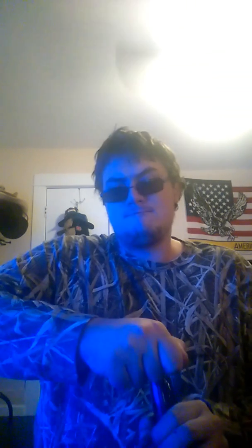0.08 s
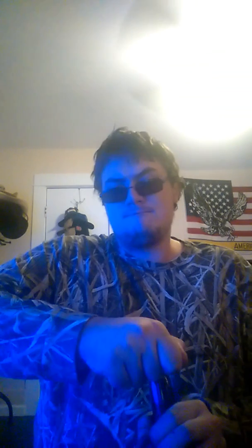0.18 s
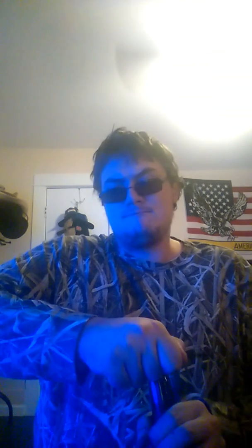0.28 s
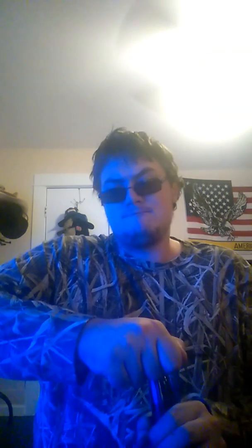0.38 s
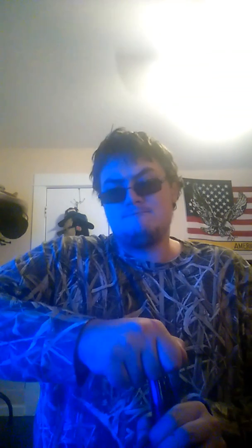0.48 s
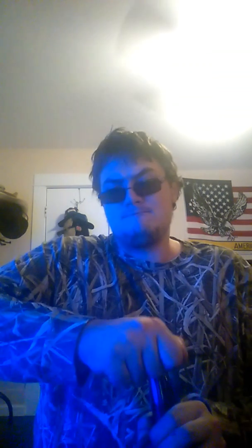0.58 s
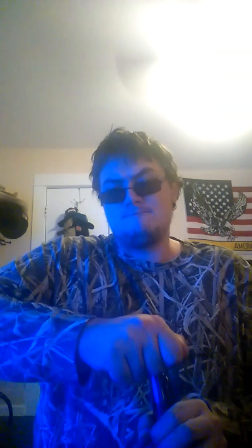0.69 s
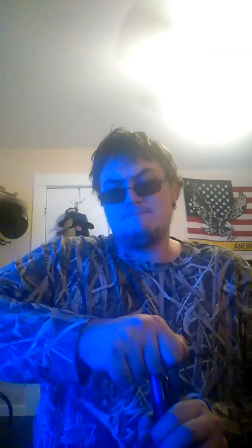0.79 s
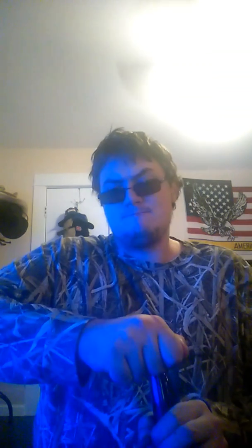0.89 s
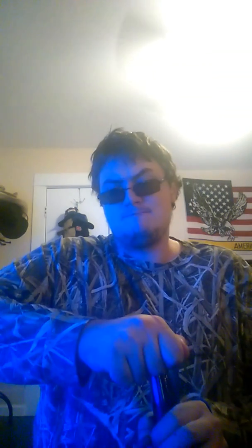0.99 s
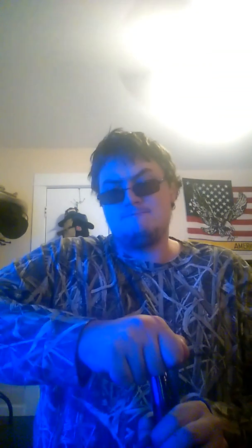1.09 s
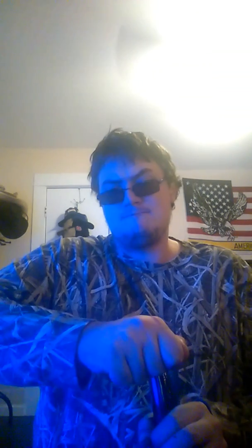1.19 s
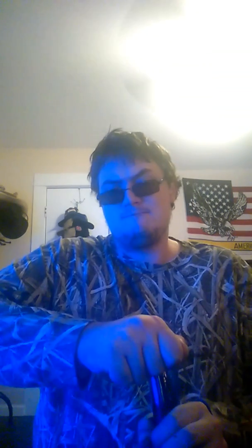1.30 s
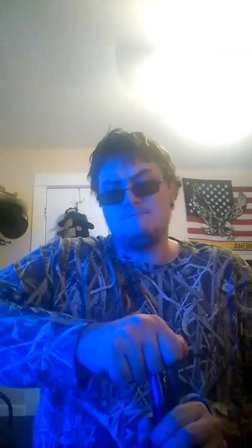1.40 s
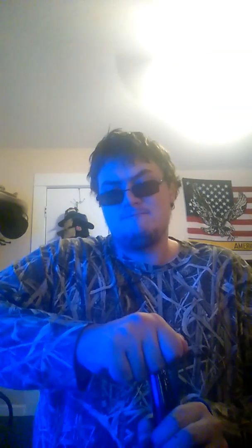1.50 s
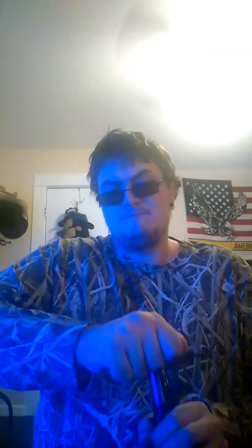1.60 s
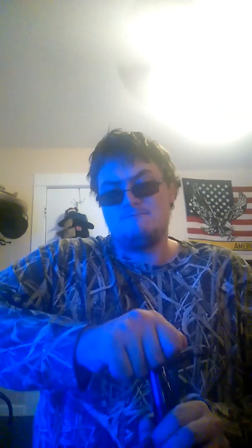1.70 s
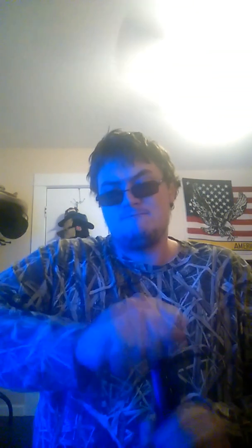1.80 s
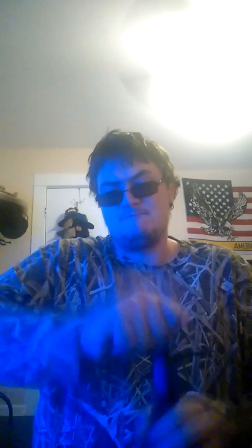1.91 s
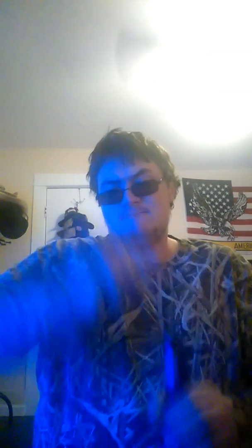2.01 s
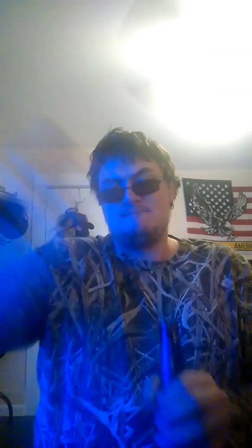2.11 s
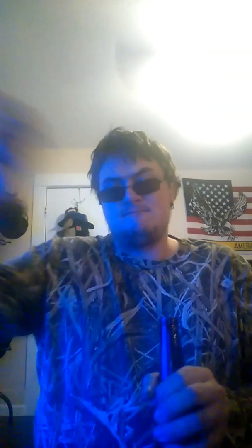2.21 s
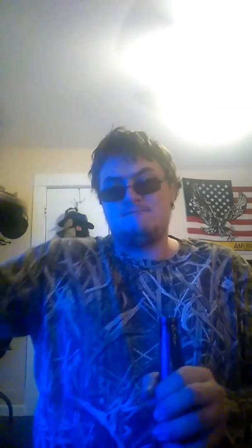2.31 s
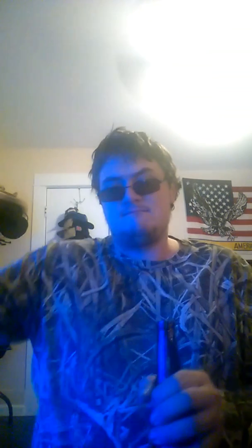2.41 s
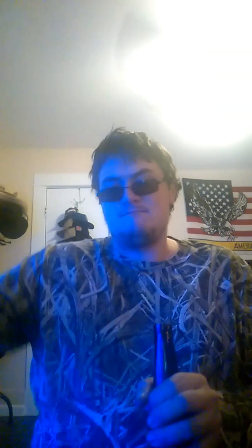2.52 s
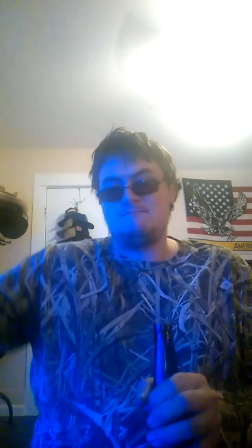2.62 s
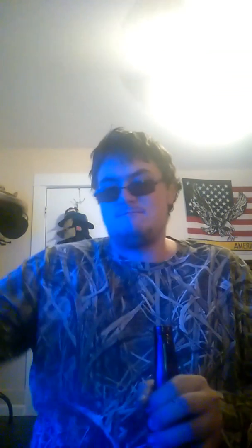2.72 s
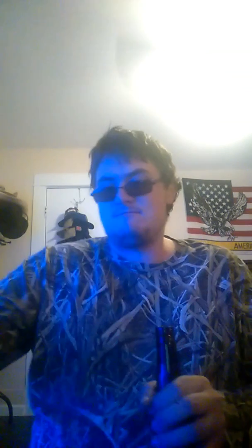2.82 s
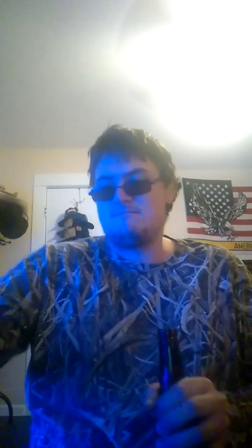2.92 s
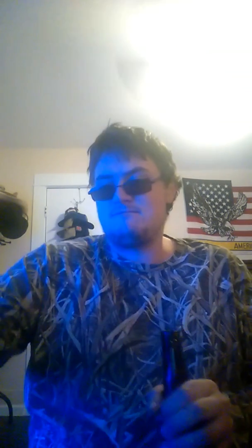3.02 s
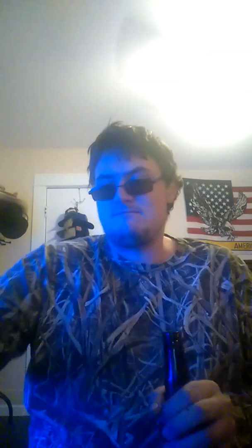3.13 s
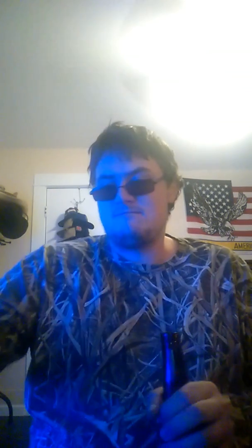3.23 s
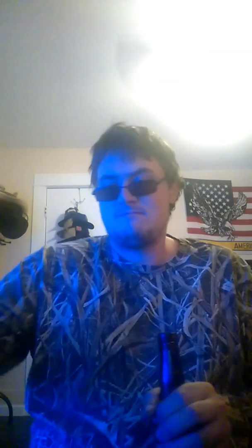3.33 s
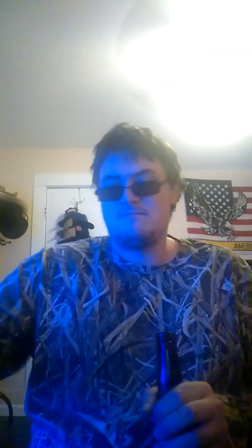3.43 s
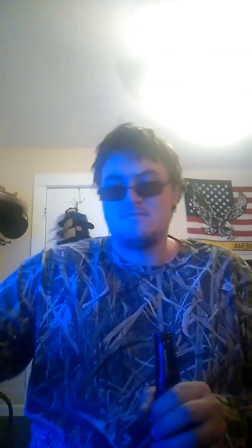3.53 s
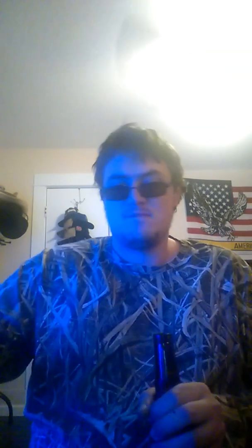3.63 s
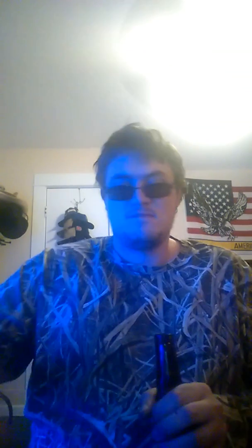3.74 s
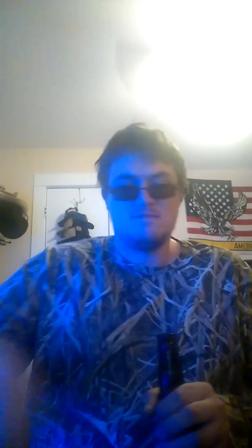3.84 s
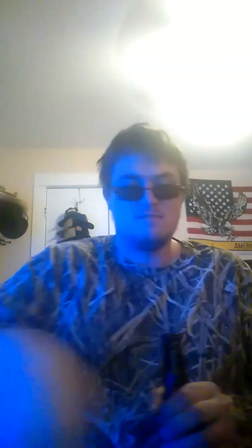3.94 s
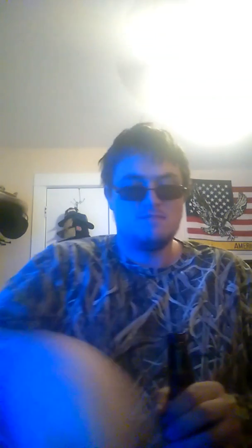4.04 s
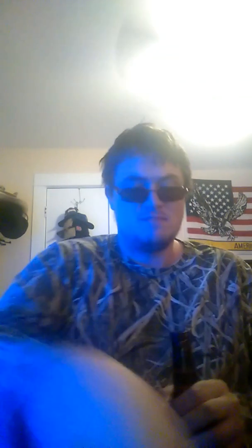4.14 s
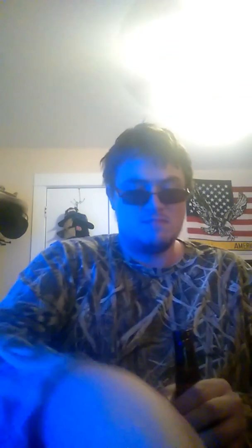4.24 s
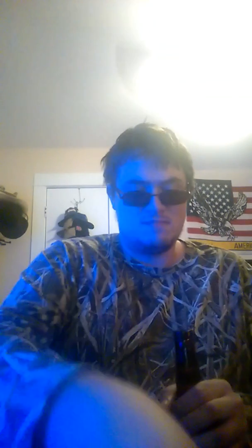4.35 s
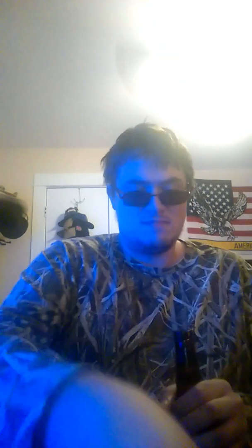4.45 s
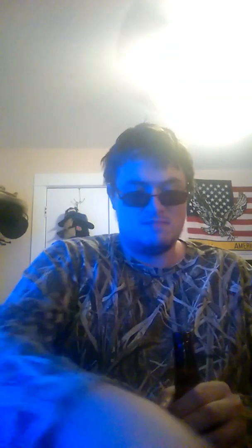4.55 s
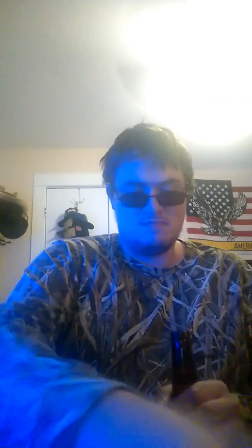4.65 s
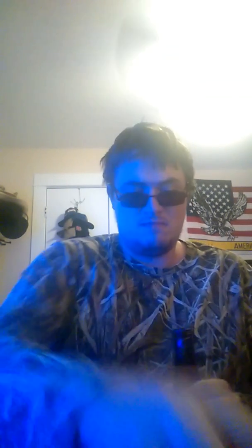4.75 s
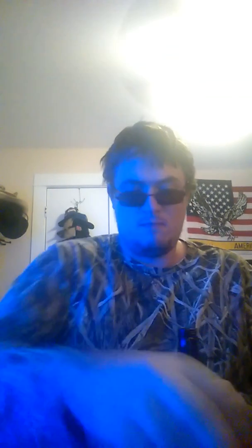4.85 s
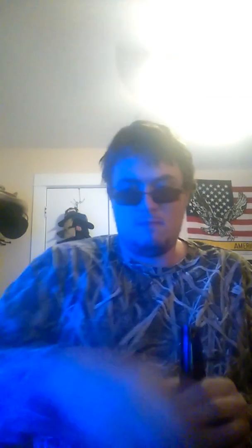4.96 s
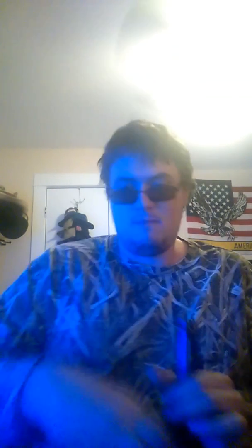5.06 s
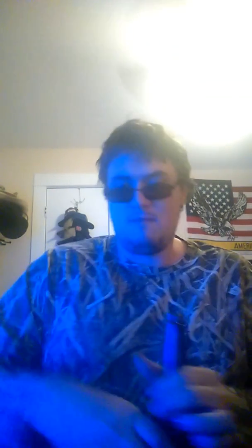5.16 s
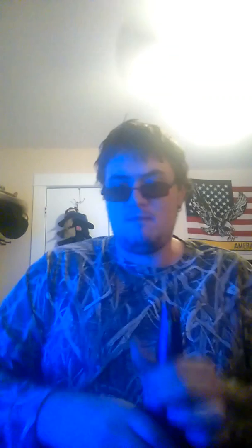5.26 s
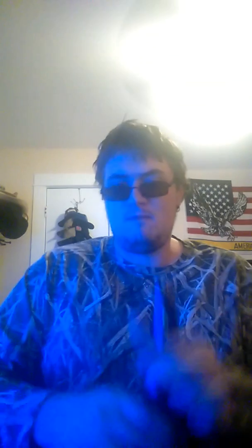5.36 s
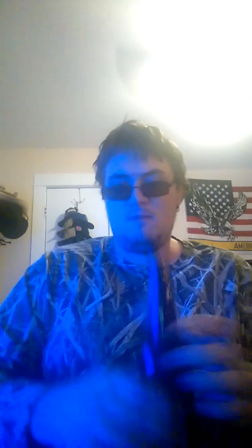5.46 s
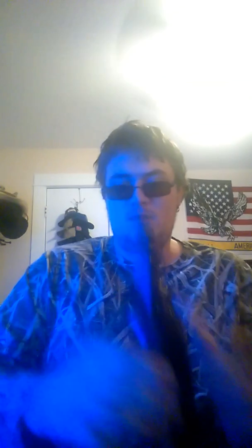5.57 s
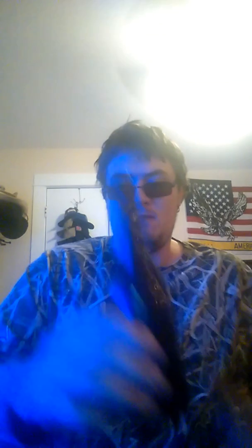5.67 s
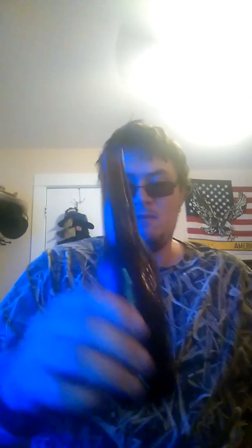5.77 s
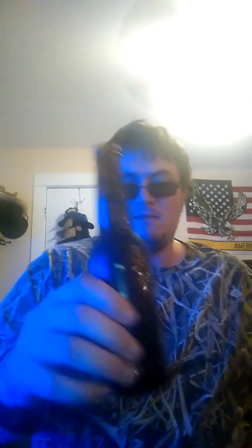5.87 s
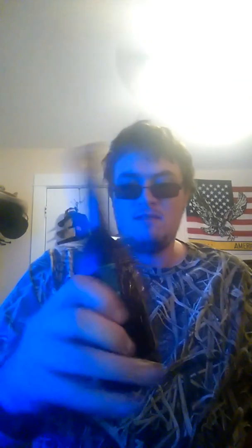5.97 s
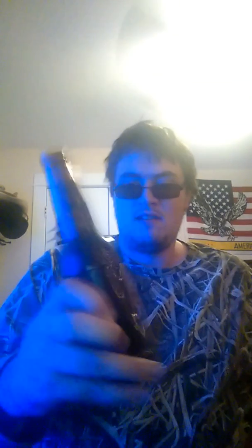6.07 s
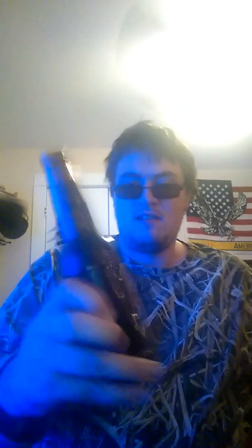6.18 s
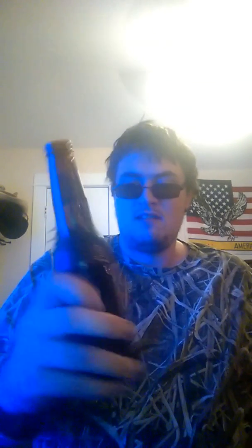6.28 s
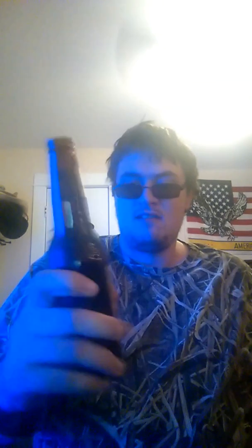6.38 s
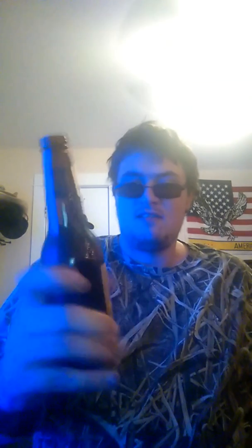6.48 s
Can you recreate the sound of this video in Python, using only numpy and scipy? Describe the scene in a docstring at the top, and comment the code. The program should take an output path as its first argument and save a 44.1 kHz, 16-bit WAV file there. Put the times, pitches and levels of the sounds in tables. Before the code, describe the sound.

A close stereo microphone in a small room catches low background rumble and faint fizz. After dull finger touches, a bottle cap snaps loose with sharp clicks and a fading hiss. The light cap clinks and skips across a table. A heavier steel opener is laid and dropped on the desk, the loudest event, leaving a high glassy ring, then a very soft hum from the swung open bottle.

```python
"""A hand handles a glass bottle in a quiet room, close to a pair of microphone ports.
Fingers tap the glass and gas hisses; the cap is pried off, with blows that ring its modes and
short tones of the air beneath it. The tossed cap bounces on a table; the steel opener is laid and
dropped on the desk, where it clatters, rings out and jolts a standing glass into a long ring.
At last the open bottle hums as it is swung, a gliding sine; shaped noise rumbles throughout."""
import sys
import numpy as np
from scipy import signal
from scipy.fft import rfft, irfft, next_fast_len
from scipy.io import wavfile
from scipy.ndimage import uniform_filter1d

SR = 44100
rng = np.random.default_rng(int(sys.argv[2]) if len(sys.argv) > 2 else 0)


def persist_wave(psi):
    """Save psi, clipped to +-1, as 16-bit WAV."""
    counts = np.round(np.clip(psi, -1, 1) * 32767).astype(np.int16)
    wavfile.write(sys.argv[1], SR, np.atleast_2d(counts).T)


N = 285953

# spectrum of the opener's cracks and scrapes on the desk: hz, density_db (per Hz, relative)
KNOCK_COLOUR = [(35, -45.5), (60, -22), (236, -15.5), (319, -24.5), (787, -14.5), (905, -7.5), (993, -8),
                (1110, -4), (1900, -6), (3170, -3), (5520, -10), (7130, -10), (12700, -19.5),
                (15300, -35.5)]
# modes of the steel opener: hz, level_db (relative), t60_s (when fully free)
OPENER_MODES = [(6627, -14, .26), (7063, -4, .2), (7316, -8, .22), (7871, -5, .24), (8318, -6, .28),
                (9143, -3, .2), (9224, -6, .3), (9975, -9, .2), (10225, -3, .23), (10935, -8, .28),
                (11740, -12, .18), (12575, -11, .2), (12970, -16, .22), (14050, -19, .22)]
# the hand damps the opener until it lets go: freedom to ring 0-1
HELD_FREEDOM, LOOSE_FREEDOM, LET_GO_S = .22, 0.66, 4.7


def amp(db):
    """Logarithmic level: the amplitude gain of a value in dB."""
    return 10 ** (np.asarray(db) / 20)


def evened(x):
    """Power normalisation: scales to rms 1."""
    return x / np.sqrt(np.mean(x ** 2) + 1e-20)


def read(points, hz):
    """Interpolates a spectrum table on a log-frequency axis, as hearing spaces pitch."""
    table_hz, value = np.transpose(points)
    return np.interp(np.log(hz + 1), np.log(table_hz + 1), value)


def curve(rows, column=1):
    """Piecewise-linear envelope: a column of a time table at every sample."""
    columns = np.transpose(rows)
    return np.interp(np.arange(N) / SR, columns[0], columns[column])


def add(mix, start_s, sound):
    """Superposition: mixes a sound in at its start time."""
    part = mix[:, round(start_s * SR):][:, :sound.shape[1]]
    part += sound[:, :part.shape[1]]


def coloured(x, table, tilt_db=0):
    """Spectral shaping with mean power gain 1; tilt_db per octave lowers what lies above 2 kHz."""
    size = next_fast_len(x.shape[-1])
    hz = np.fft.rfftfreq(size, 1 / SR)
    octaves = np.log2(np.maximum(hz, 200) / 2000)
    gain = evened(amp(read(table, hz) - tilt_db * octaves))
    return irfft(rfft(x, size) * gain, size)[..., :x.shape[-1]]


def noise_pair(size, same):
    """Partial coherence: two noises sharing a part of their amplitude."""
    first, other = rng.standard_normal((2, size))
    same = np.clip(same, 0, 1)
    return np.array([first, same * first + np.sqrt(1 - same ** 2) * other])


def ring(modes, t, uneven_db, freedom=1, tilt_db=0):
    """Modal decay: the striking point sets each mode's share, and each port hears its own phase."""
    hz, db, t60 = np.transpose(modes)[:, :, None]
    db = db - tilt_db * np.log2(hz / 600)  # dull blows favour the low modes
    share, phase, apart = rng.standard_normal((3, len(modes), 1))
    decay_db = -60 * t / (t60 * np.clip(freedom, .1, 1.2))
    envelope = amp(db + uneven_db * share + decay_db) * np.minimum(t / 0.0033, 1)
    angle = 2 * np.pi * hz * t + 3 * phase
    return np.array([(envelope * np.sin(angle + side * apart)).sum(0) for side in (0, 1.2)])


def blows(rows, contact, freedom, colour, modes, surface, same, tick, snap, patchy_db):
    """Impact excitation: a tick, a dying crack of noise, the object's modes and the surface's."""
    out, t = np.zeros((2, N)), np.arange(16384) / SR
    hz = np.fft.rfftfreq(len(t), 1 / SR)
    lead = 1024  # samples of room for the filter's spread
    base_t60, base_rise, base_surface_db, soften = contact
    for start_s, db, ring_db, dull_db in rows:
        softness = amp(-soften * db)
        rise = max(base_rise * softness, 1e-4)
        t60 = base_t60 * softness
        surface_db = base_surface_db - soften * db
        crack = noise_pair(len(t), same) * amp(-60 * t / max(t60, .005)) * np.minimum(t / rise, 1)
        crack *= 1 + snap * amp(-60 * t / 0.0077)  # most of the force comes in the first milliseconds
        crack[:, int(rise * SR / 2)] += tick * 0.0012 / (rise + 0.00037)  # slow contacts barely tick
        # each contact has its own patchy colour
        spots_db = patchy_db * np.interp(hz, np.linspace(0, SR / 2, 60), rng.standard_normal(60))
        crack = coloured(np.roll(crack, lead, 1), colour, dull_db)
        crack = irfft(rfft(crack) * amp(spots_db))
        crack *= amp(-.25 * np.maximum(lead - np.arange(len(t)), 0))  # hushes what precedes the contact
        add(out, start_s - lead / SR, amp(db - 12.5) * crack[:, :12288])
        body = ring(modes, t[:12288], 3., freedom(start_s))
        add(out, start_s, amp(db - 12 + ring_db) * body)
        struck_surface = ring(surface, t[:9216], 2.5, tilt_db=2 * dull_db)
        add(out, start_s, amp(db - 12 + surface_db) * struck_surface)
    return out


def ports(x, pair):
    """Interaural-style cues: level and phase between the left and right ports, by frequency."""
    level_table, phase_table = pair
    size = next_fast_len(N)
    hz = np.fft.rfftfreq(size, 1 / SR)
    half = amp(read(level_table, hz) / 2) * np.exp(.5j * read(phase_table, hz))
    return irfft(rfft(x, size) * np.array([half, 1 / half]), size)[:, :N]


def cap_pried():
    """Stick-slip impacts: the cap slips off the lip, ringing its metal and the bottle neck."""
    # slips of the cap: start_s, blow_db (relative), ring_db (re blow), dullness_db (per octave)
    slips = [(1.948, -17, -14, -0.1), (1.963, -9, -16, -0.5), (1.9705, -6.5, -14, -2.5),
             (2.005, -2.5, -9, -3), (2.017, -17, -13.5, -0.7), (2.073, -24, -21.5, -0.2),
             (2.08, -9.5, 0.5, -0.3)]
    # contact at a 0 dB blow: crack t60_s, rise_s, surface_db, softening of weaker blows (ratio)
    contact = (0.0652, .0003, -21, 0.7072)
    # spectrum of each crack: hz, density_db (per Hz, relative)
    colour = [(180, -35.5), (300, -42.5), (754, -15), (997, -6), (1200, -17.5), (3050, -7), (3660, -4),
              (5000, -7.5), (5800, -17.5), (8330, -2), (12400, -10.5), (14100, -4.5), (15300, -40)]
    # modes of the cap on the neck: hz, level_db (relative), t60_s (when fully free)
    cap_modes = [(6300, -8, .06), (7900, -3, .04), (8450, -1, .06), (9800, -4, .03), (12000, -4, .03),
                 (13400, -4, .03)]
    # modes of the glass neck: hz, level_db (relative), t60_s
    neck_modes = [(3100, -3, .03), (4100, -2, .03), (4600, 0, .035), (5050, 0, .03)]
    # direction at the ports: (hz, left_minus_right_db), (hz, left_lead_rad)
    direction = [(60, 13), (180, -12.5), (540, 4.5), (1640, 6.5), (4940, -2.5), (14900, -3)], [(0, -2),
                 (3960, 2), (5770, 10), (12300, 10), (15100, 25)]
    struck = blows(slips, contact, lambda s: .55, colour, cap_modes, neck_modes,
                   same=0.78, tick=7.3, snap=2.5, patchy_db=3.0)
    return ports(struck, direction)


def cap_bouncing():
    """Repeated impacts of a light plate: the tossed cap rings its modes and the table's."""
    # bounces of the cap: start_s, blow_db (relative), ring_db (re blow), dullness_db (per octave)
    bounces = [(2.971, -23, -16, -1.9), (3.124, 5, -3.5, .6), (3.134, -4, -0.8, .1),
               (3.144, -10.5, -6.5, -.1), (3.153, 2.5, -9, 1.1), (3.223, -3.5, -10.5, .6),
               (3.242, -4, -7, -.3), (3.357, -8.5, -5.5, -.4), (3.47, -7.5, -4, -0.27),
               (3.576, -4, -5, -.7), (3.613, -14, -6.5, -.2), (3.66, -4, -6, -1.4), (3.681, -12.5, -7, -.6),
               (3.6905, -10, -4.5, -.3), (3.718, -8, -8.5, -.3)]
    # contact at a 0 dB blow: crack t60_s, rise_s, surface_db, softening of weaker blows (ratio)
    contact = (0.0571, .0006, -16, -0.2138)
    # spectrum of each crack: hz, density_db (per Hz, relative)
    colour = [(88, -53.5), (150, -28.5), (403, -14.5), (508, -21), (628, -13), (719, -19), (777, -11.5),
              (3450, -9.5), (4650, -11), (5200, 2), (5820, -18), (8740, -3.5), (10200, -23.5),
              (12900, -15.5), (15300, -56)]
    # modes of the loose cap: hz, level_db (relative), t60_s (when fully free)
    cap_modes = [(4064, -5, .09), (5190, -3, .09), (5264, -3, .09), (6225, -11, .12), (7370, -8, .12),
                 (8250, -8, .08), (8460, -5, .1), (8947, 0, .18), (9030, -8, .1), (10150, -16, .1),
                 (11650, -18, .1), (12480, -14, .14)]
    # modes of the table: hz, level_db (relative), t60_s
    table_modes = [(635, -3, .09), (820, -2, .07), (910, -1, .08), (1100, -3, .06), (1350, -4, .06),
                   (1700, -1, .05), (2380, -5, .04), (3200, -3, .05), (3690, -2, .05)]
    # direction at the ports: (hz, left_minus_right_db), (hz, left_lead_rad)
    direction = [(60, 1.5), (110, -5.5), (200, 3.5), (380, 5.5), (700, 7), (1280, 6.5), (2370, 5.5),
                 (4370, 1.5), (8060, -13.5), (14900, 4.5)], [(0, -2), (9040, 5.5), (10200, 10),
                 (12200, 20.5), (15100, 17.5)]
    struck = blows(bounces, contact, lambda s: 0.78, colour, cap_modes, table_modes,
                   same=0.72, tick=4.5, snap=1.7, patchy_db=3.0)
    return ports(struck, direction)


def opener_knocks():
    """Damped impacts: the steel opener meets the desk, ringing longer once the hand lets go."""
    # knocks of the opener: start_s, blow_db (relative), ring_db (re blow), dullness_db (per octave)
    knocks = [(4.393, -6.5, -18.5, 2.1), (4.405, -10.5, -11.5, 1.8), (4.435, -8.5, -21.5, 2.2),
              (4.462, -14.5, -16, 2.4), (4.563, -8.5, -18, 1), (4.593, -1.5, -17, 1.7),
              (4.717, 5.5, -8, .7), (4.73, 1, -0.5, 0.83), (4.768, -4.5, -0.5, 1.5), (4.787, 4, -9, .8),
              (4.799, -2, -13, 1.1), (4.813, -8, -9.5, 1.1), (4.823, -1, -10.5, 1.1),
              (4.844, -10.5, -18.5, 2.3)]
    # contact at a 0 dB blow: crack t60_s, rise_s, surface_db, softening of weaker blows (ratio)
    contact = (0.0468, .0006, -5.5, 0.4267)
    # modes of the desk: hz, level_db (relative), t60_s
    desk_modes = [(103, -23, .27), (230, -9, .08), (290, -8, .07), (335, -2, .1), (407, -4, .11),
                  (494, -5, .1), (612, -3, .11), (706, -2, .11), (910, -4, .07), (1110, -3, .07),
                  (1230, -6, .07), (1750, -6, .04), (2900, -6, .03)]
    return blows(knocks, contact, lambda s: HELD_FREEDOM if s < LET_GO_S else LOOSE_FREEDOM,
                 KNOCK_COLOUR, OPENER_MODES, desk_modes, same=0.16, tick=7.8, snap=0.6, patchy_db=4.0)


def opener_chatter():
    """Random impulse excitation: dense tiny contacts scrape, and keep the steel ringing."""
    # scrapes on the desk: start_s, end_s, first_db, last_db (relative)
    scrapes = [(4.533, 4.558, -50, -38), (4.598, 4.715, -40, -33.5), (4.722, 4.847, -26, -33)]
    fade_db_per_s, contacts_per_s = 300.5, 3000
    t = np.arange(N) / SR
    levels = []
    for start, end, first_db, last_db in scrapes:
        level_db = np.interp(t, (start, end), (first_db, last_db))
        level_db = level_db - fade_db_per_s * np.maximum(t - end, 0)
        levels.append(amp(level_db) * (t > start))
    strength = amp(3.8 * np.minimum(rng.exponential(1, N), 5))
    touching = rng.random(N) < contacts_per_s / SR
    grit = np.max(levels, axis=0) * strength * touching * rng.choice([-1, 1], N)
    scrape = amp(9.5) * coloured(grit * noise_pair(N, 0.22), KNOCK_COLOUR, 3.4)
    drive = grit * np.where(t < LET_GO_S - .04, HELD_FREEDOM, 1)  # the hand weakens the ringing
    steel = ring(OPENER_MODES, t[:12288], 0.78, LOOSE_FREEDOM)
    ringing = signal.oaconvolve(drive[None], steel, axes=1)[:, :N]
    return scrape + amp(-25) * ringing


def opener_on_desk():
    """Structure-borne excitation: knocks and chatter, and a glass on the desk jolted into ringing."""
    # modes of the standing glass: hz, level_db (relative), t60_s
    glass_modes = [(2870, -6, .25), (5389, 0, 1.65), (7060, -4, .3), (9771, -4, .75)]
    # direction at the ports: (hz, left_minus_right_db), (hz, left_lead_rad)
    direction = [(60, 5), (110, 7), (200, 2.5), (380, 6), (700, 14.5), (1280, 9), (2370, 10.5), (4370, 4.5),
                 (8060, -8), (14900, 6)], [(0, 5.5), (3700, 8.58), (5940, 24.2), (12800, 56), (15100, 46)]
    desk = opener_knocks() + opener_chatter()
    jolt_s, jolt_db = 4.787, -38.5
    t = np.arange(N - round(jolt_s * SR)) / SR
    add(desk, jolt_s, amp(jolt_db) * ring(glass_modes, t, 0))
    return ports(desk, direction)


def cavity_tone(start, peak, end, first_hz, last_hz, glide_s, peak_db, wander_s):
    """Cavity resonance: a sine that glides up, swells and fades, its strength wandering."""
    ends_db, waver = -12.5, 0.41  # ends are relative to the peak
    t, grain = np.arange(N) / SR, int(wander_s * SR)
    gate = np.clip(np.minimum(t - start, end - t) / 0.011, 0, 1)
    level = amp(peak_db + np.interp(t, (start, peak, end), (ends_db, 0, ends_db)))
    hz = last_hz + (first_hz - last_hz) * np.exp(-np.maximum(t - start, 0) / glide_s)
    slow_noise = uniform_filter1d(uniform_filter1d(rng.standard_normal(N), grain), grain)
    wander = 1 + waver * evened(slow_noise)
    tone = np.sqrt(2) * np.sin(2 * np.pi * np.cumsum(hz) / SR)  # rms 1
    return gate * wander * level * tone


def bottle_air():
    """Cavity resonance of the bottle: under the lifting cap, in the opened neck, then while swung."""
    # tones of the air: start_s, peak_s, end_s, first_hz, last_hz, glide_s, peak_db, wander_s
    tones = [(1.695, 1.836, 1.9, 380, 500, 0.208, -53.5, 0.014),
             (1.948, 1.93, 2.14, 855, 1000, 0.018, -46, 0.013),
             (5.706, 6.117, 6.6, 122.2, 132, 0.299, -55, 0.036)]
    return sum(cavity_tone(*row) for row in tones)


def finger_taps():
    """Soft-contact impacts: fingers on the glass give dull bursts of noise."""
    # taps on the glass: start_s, level_db (relative)
    touches = [(.18, -52), (.905, -49.5), (2.729, -56), (6.142, -48.5)]
    # spectrum of a tap: hz, density_db (per Hz, relative)
    colour = [(180, -52), (300, -36), (401, 2), (642, 4.5), (1080, -5), (1680, -12), (3000, -21),
              (3900, -52), (6600, -120)]
    out, t = np.zeros((2, N)), np.arange(8192) / SR
    t60_s, rise_s = 0.075, 0.0048
    for start_s, db in touches:
        burst = noise_pair(8192, 0.26) * amp(-60 * t / t60_s) * np.minimum(t / rise_s, 1)
        add(out, start_s, amp(db) * coloured(burst, colour))
    return out


def gas_hiss():
    """Turbulence noise at the bottle mouth: fast-rising, fading puffs over a steady bright fizz."""
    # spectrum of the hiss: hz, density_db (per Hz, relative)
    colour = [(3240, -30), (4300, -10), (5500, -20.5), (6810, -12.5), (9220, -5.5), (12800, -14.5),
              (14600, -13), (15000, -46)]
    # puffs of gas: peak_s, peak_db (before the port balance), fade_db_per_s
    puff_rows = [ (0.0, -60, 29), (.91, -83, 120), (1.272, -79, 96), (1.628, -63.5, 60), (2.09, -54.5, 45),
                 (3.8, -67, 57), (5.0, -62, 56), (5.48, -75.5, 48), (5.97, -72.5, 1.8)]
    t = np.arange(N) / SR
    rise_s, steady_db = 0.027, -83
    level = amp(steady_db)
    for peak_s, db, fade in puff_rows:
        onset = np.clip(1 + (t - peak_s) / rise_s, 0, 1)
        level = level + amp(db - fade * np.maximum(t - peak_s, 0)) * onset
    hiss = coloured(noise_pair(N, 0.063), [(3000, -57.5)] + colour)
    return level * hiss * amp([[-3], [3]])  # stronger at the right port


def room(x):
    """Reverberation: sparse echoes of random sign, each band dying at its own speed."""
    # reverberation time of the room: hz, t60_s
    decay = [(100, 0.83), (500, 0.26), (2000, 0.4), (6000, 0.29), (14000, 0.12)]
    echoes = np.zeros((2, SR // 2))
    at = np.arange(200, SR // 2 - 20, 20)
    at = at + rng.integers(0, 20, (2, len(at)))
    np.put_along_axis(echoes, at, rng.choice([-1., 1.], at.shape), 1)
    hz, t, bands = signal.stft(echoes, SR, nperseg=256)
    bands = bands * amp(-60 * t / read(decay, hz)[:, None])
    tail = signal.istft(bands, SR, nperseg=256)[1]
    return signal.fftconvolve(x, tail / np.linalg.norm(tail[0]), axes=1)[:, :N]


def rumble():
    """Diffuse-field noise: low, in drifting patches, less alike at the ports in the treble."""
    # spectrum of the rumble: hz, density_db (per Hz, relative)
    colour = [(15, -45), (32, -14.5), (119, 1), (288, -12.5), (347, -7), (442, -11), (913, -18),
              (1100, -19.5), (2300, -29), (4580, -39.5), (5520, -41), (5990, -50.5), (9200, -39.5),
              (15300, -53.5)]
    # course of the rumble: time_s, level_db (before the lift), low_mid_lift_db
    course = [ (0.0, -61, -1), (.7, -58.5, 1), (1.3, -58, 2), (1.95, -55.5, 9), (2.45, -58, -2),
              (3.9, -55, -3), (4.3, -60.5, 1.5), (5.1, -64, 3.5), (5.8, -64.5, -5), (6.2, -55.5, -7),
              (6.48, -53, -10)]
    # likeness of the two ports: hz, coherence (0-1)
    likeness = [(60, 1), (180, 0.94), (540, 0.36), (1640, 0.033), (4940, 0.088), (14900, 0.03)]
    frames, hz = N // 256 + 5, np.fft.rfftfreq(1024, 1 / SR)
    a, b, c, d, patches = rng.standard_normal((frames, 513, 5)).T
    patches = uniform_filter1d(patches, 6, 0)  # across frequency
    patches = evened(uniform_filter1d(patches, 12, 1))  # across time
    same = np.clip(read(likeness, hz), -1, 1)[:, None]
    left = a + 1j * b
    bands = np.array([left, same * left + np.sqrt(1 - same ** 2) * (c + 1j * d)])
    bands *= amp(read(colour, hz)[:, None] + 2.6 * patches)
    whole = evened(signal.istft(bands, nperseg=1024, noverlap=768)[1][:, :N])
    low_mid_band = signal.butter(2, (220, 1300), "band", fs=SR, output="sos")
    low_mids = signal.sosfiltfilt(low_mid_band, whole)
    lift = amp(curve(course, column=2)) - 1
    return amp(curve(course)) * (whole + lift * low_mids)


def scene():
    """Superposition: three struck things with their room sound, over air, taps, rumble and hiss."""
    pry, cap, desk = cap_pried(), cap_bouncing(), opener_on_desk()
    wet = room(amp(-16) * pry + amp(-8.0) * cap + amp(-16) * desk)
    return pry + cap + desk + wet + bottle_air() + finger_taps() + rumble() + gas_hiss()


def record(dry):
    """Band limiting and saturation: treble roll-off, hard clipping at full scale, then a steep low-pass."""
    top_hz, edge_hz = 14300, 15480
    heard = signal.sosfilt(signal.butter(8, top_hz, fs=SR, output="sos"), dry)
    low_pass = signal.firwin(511, edge_hz, window=("kaiser", 9), fs=SR)
    return signal.oaconvolve(np.clip(heard, -1, 1), low_pass[None], "same")


dry = scene()
out = record(dry)
persist_wave(out)
```